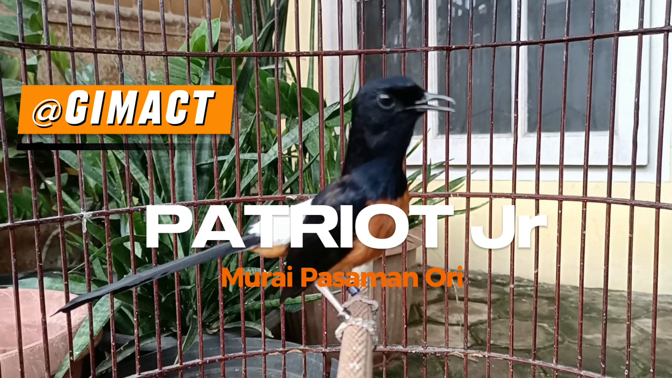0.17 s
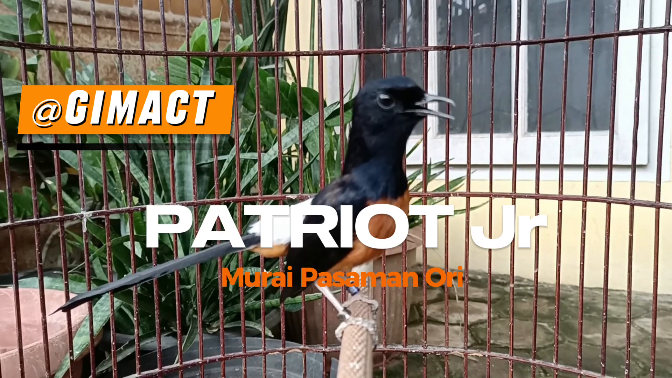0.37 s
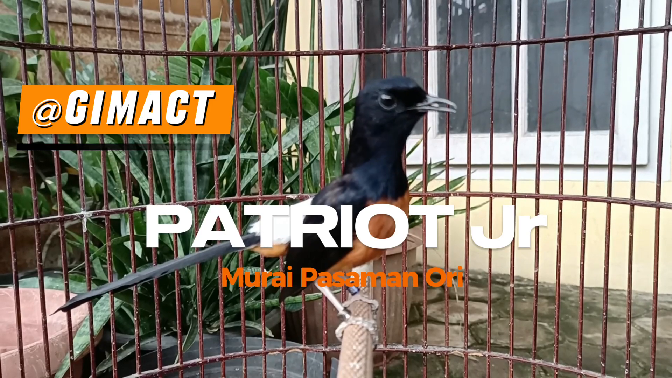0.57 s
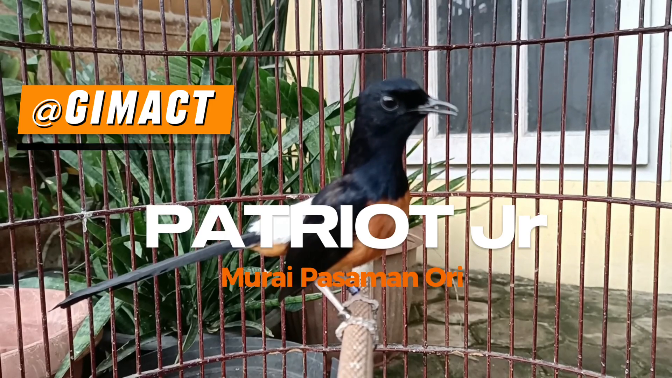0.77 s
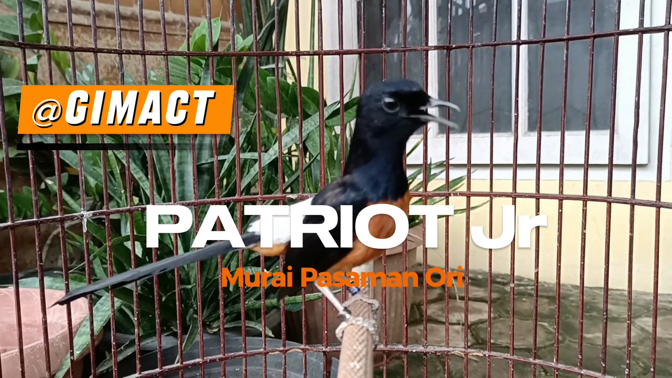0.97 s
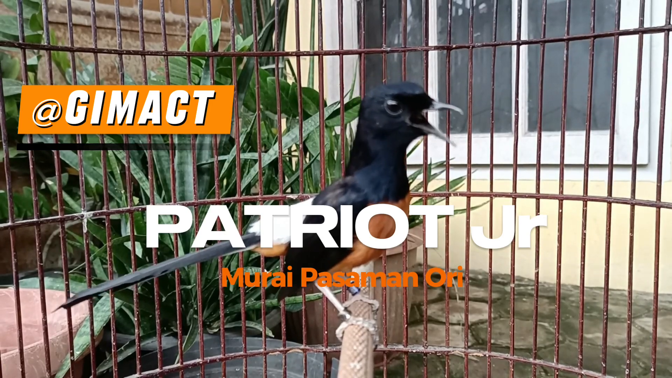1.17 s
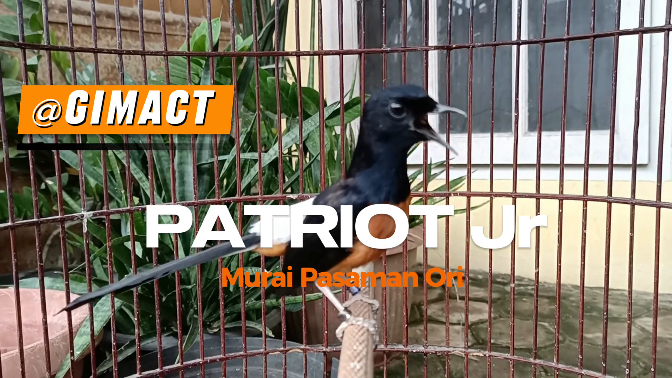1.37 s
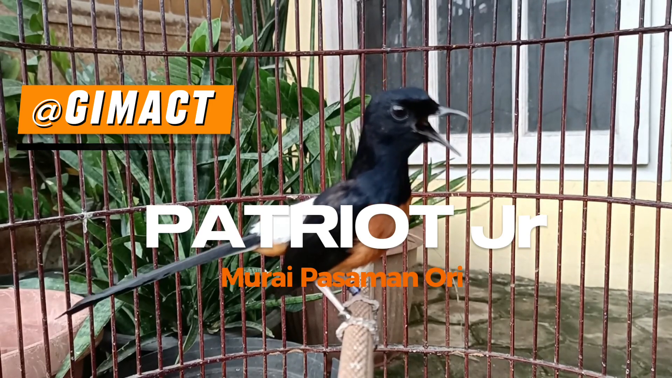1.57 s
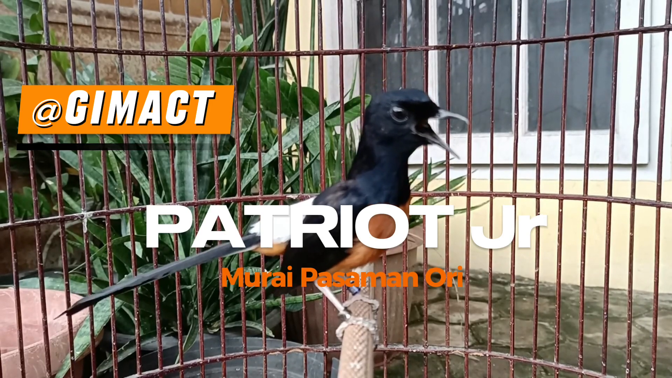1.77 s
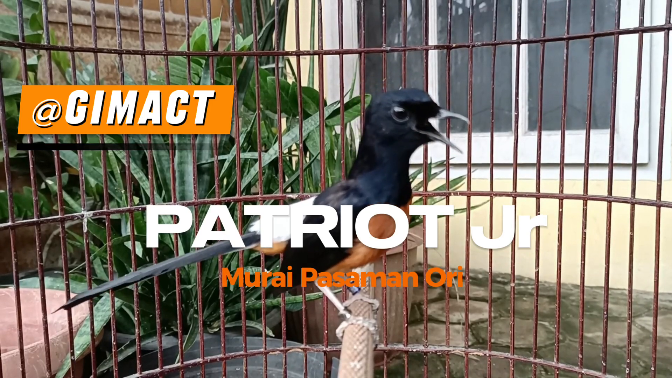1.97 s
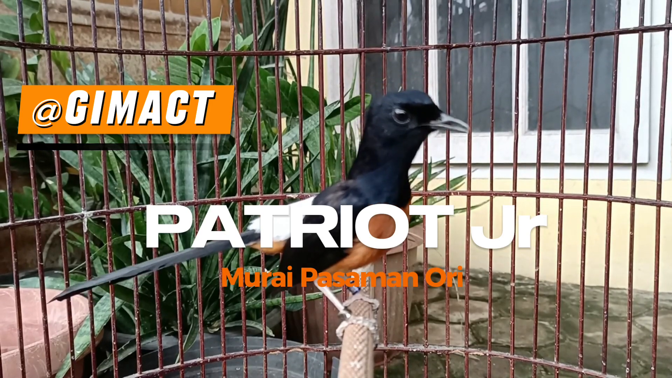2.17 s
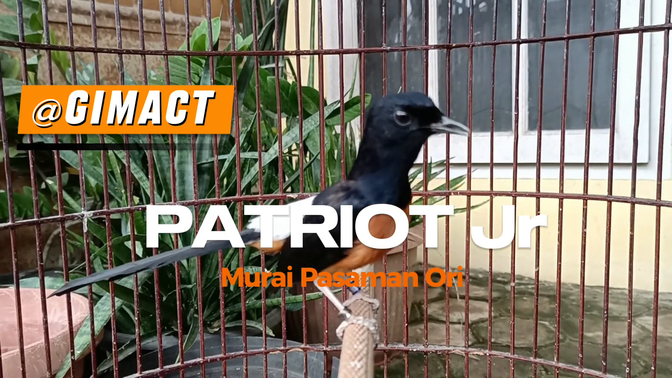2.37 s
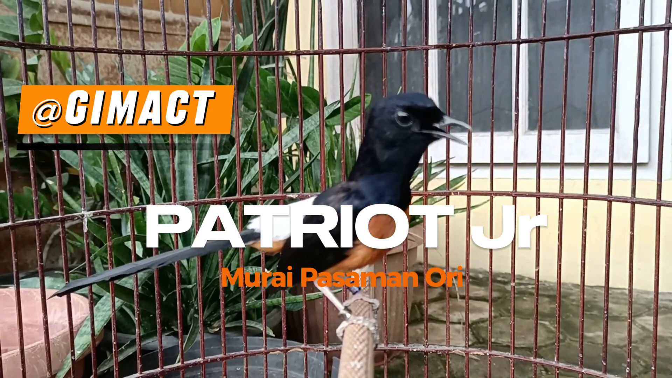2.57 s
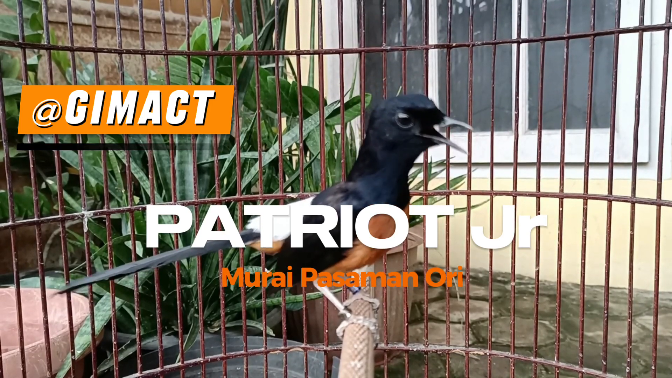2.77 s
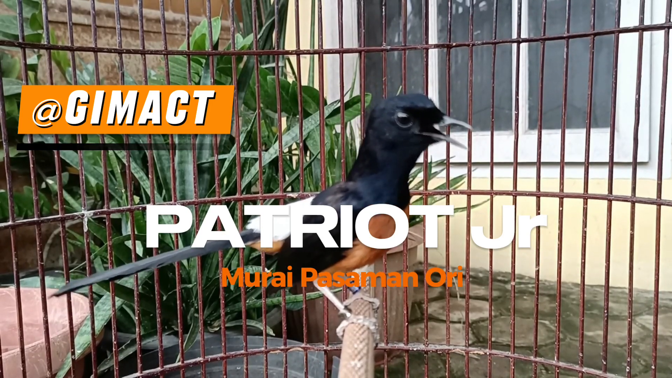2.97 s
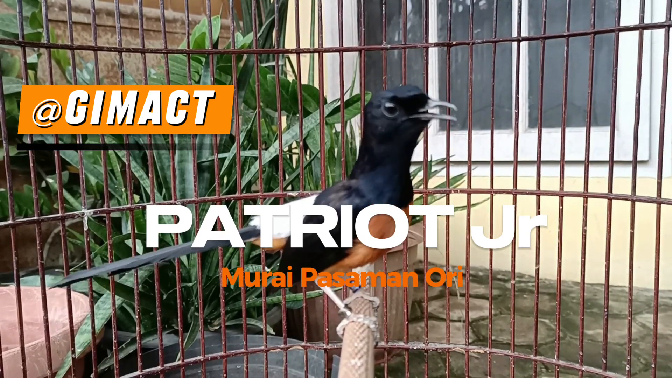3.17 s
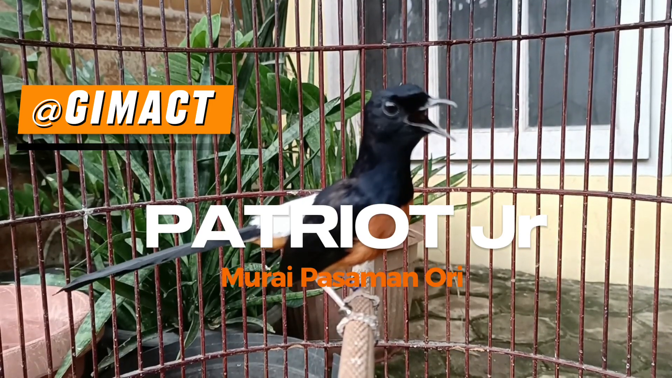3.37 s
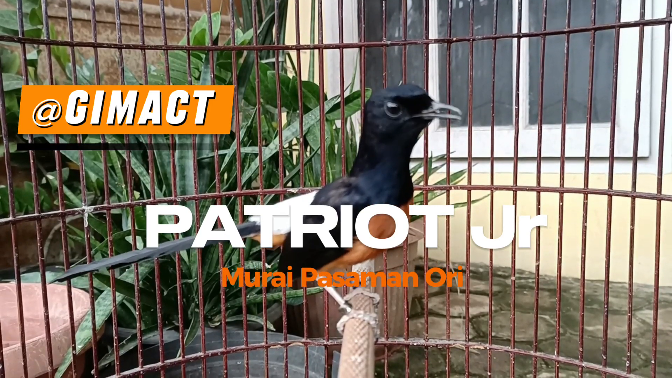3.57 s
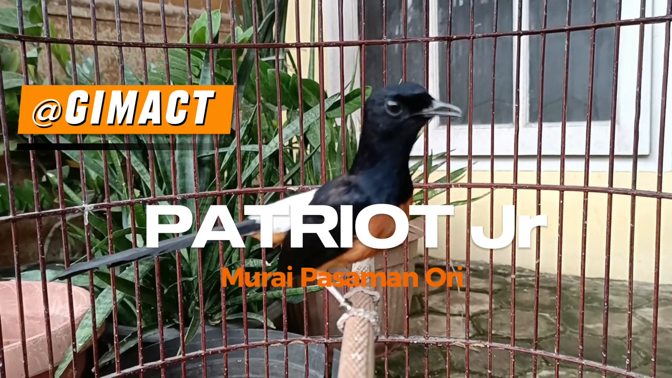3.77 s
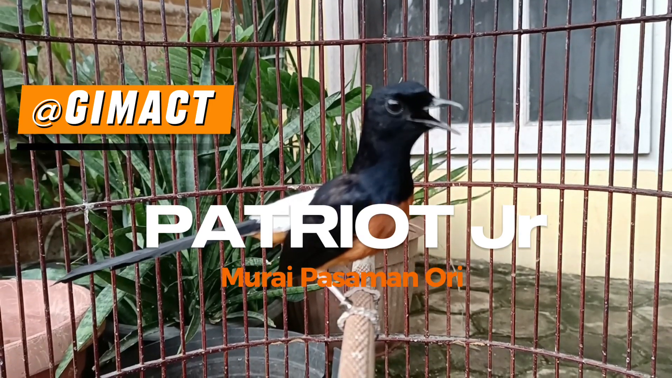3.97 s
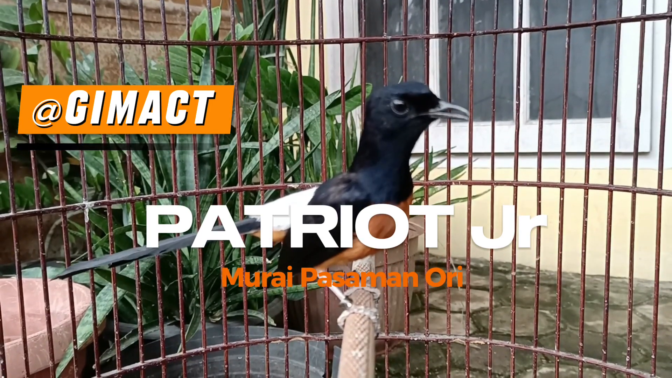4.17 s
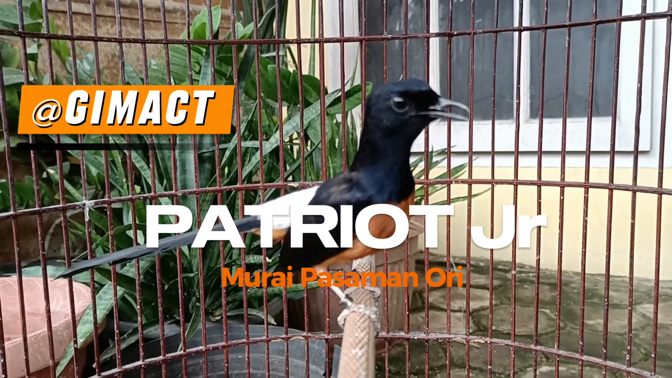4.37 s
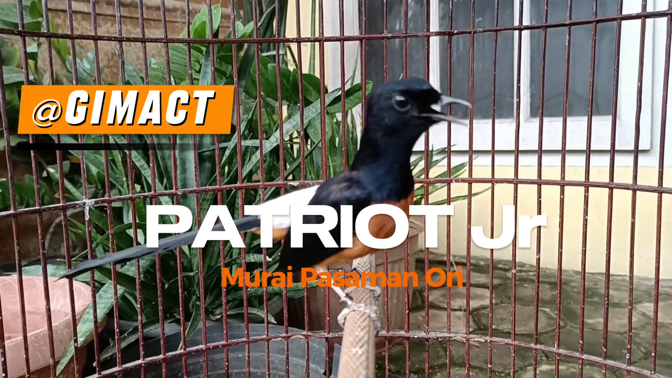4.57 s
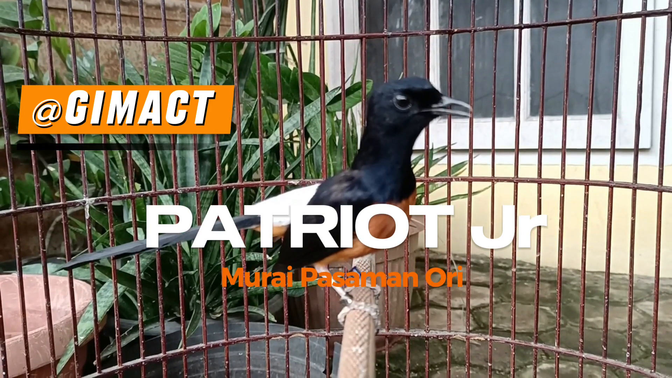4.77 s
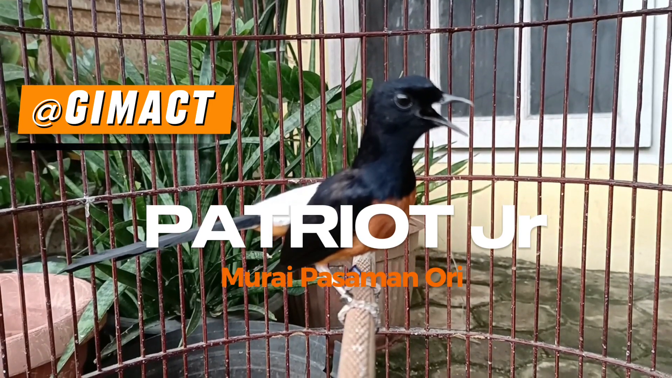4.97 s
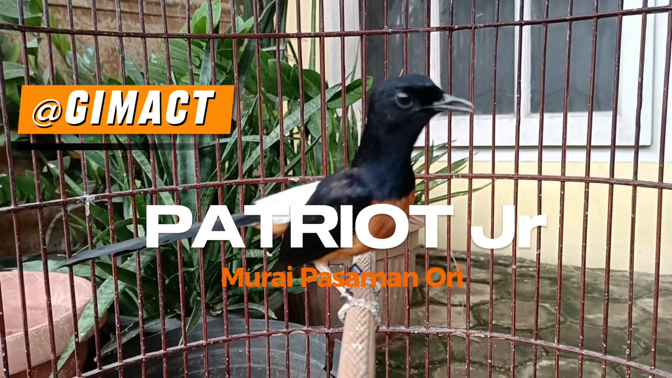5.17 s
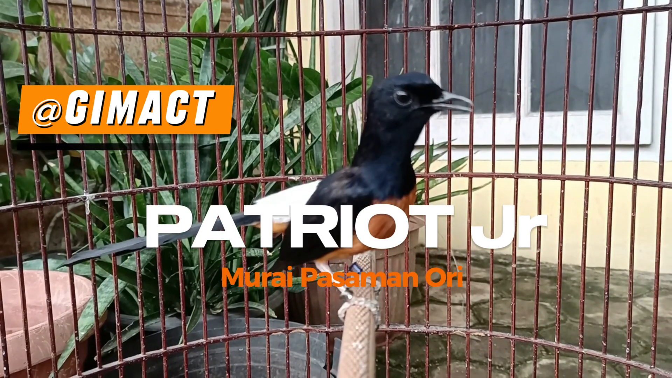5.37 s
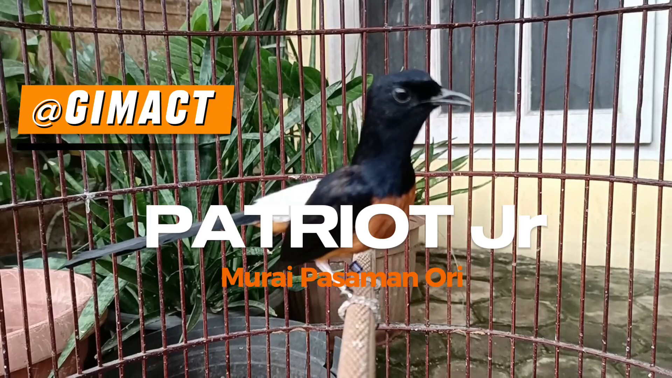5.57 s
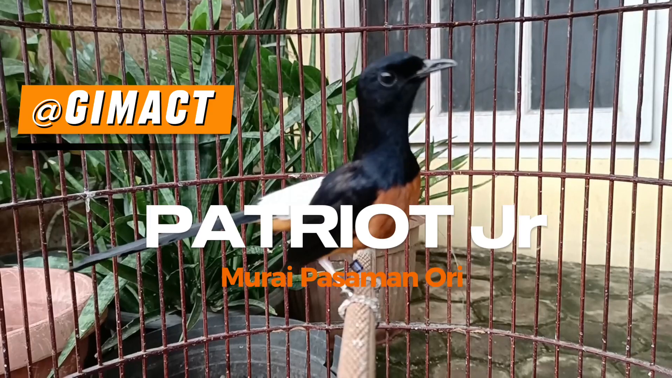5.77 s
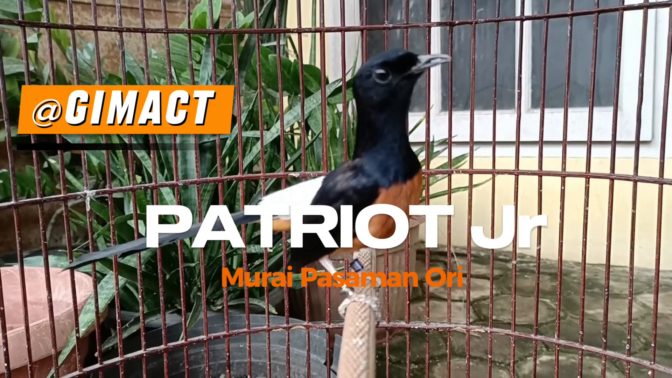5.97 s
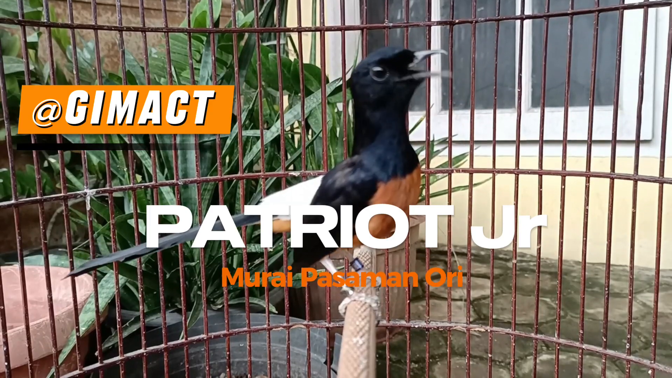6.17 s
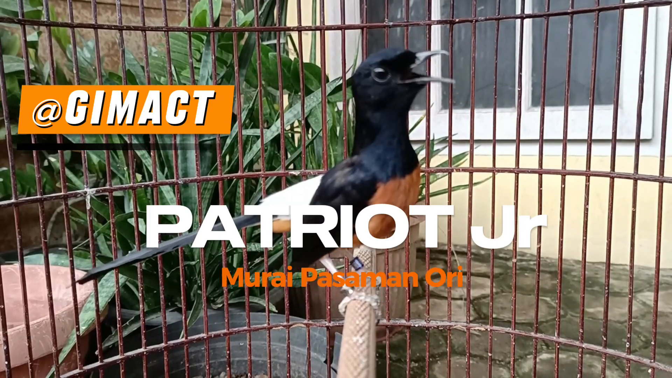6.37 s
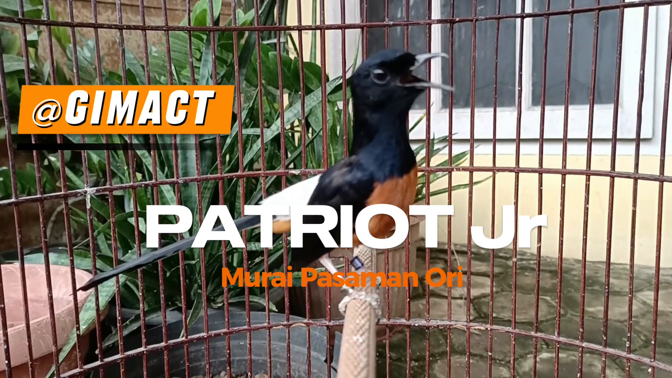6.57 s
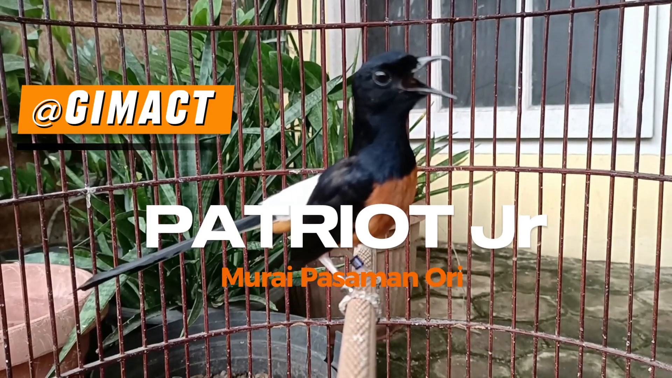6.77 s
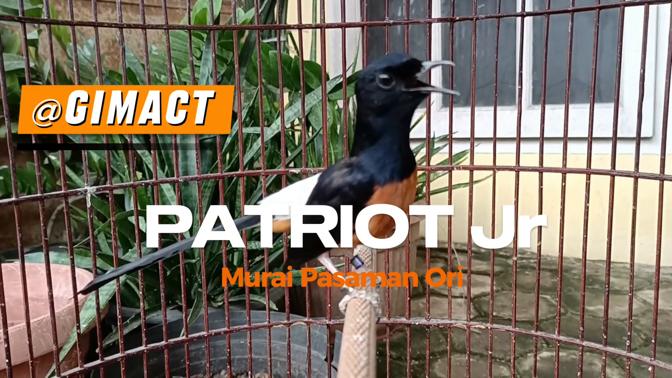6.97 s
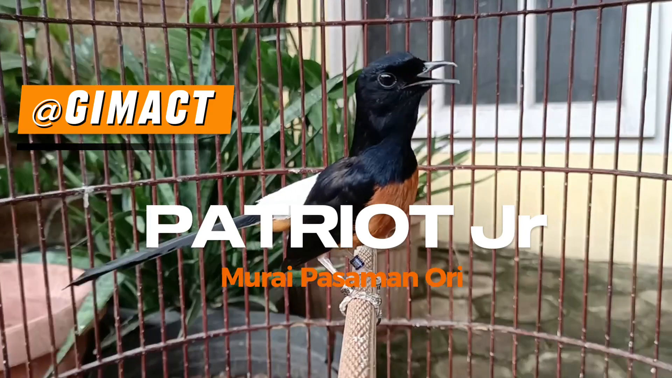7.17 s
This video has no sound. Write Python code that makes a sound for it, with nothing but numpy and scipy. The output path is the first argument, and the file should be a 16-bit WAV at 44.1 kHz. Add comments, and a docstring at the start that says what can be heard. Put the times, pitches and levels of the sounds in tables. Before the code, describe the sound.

A songbird sings close by in a small yard, with clear whistles, rising warbled sweeps and a fast run of high notes.

```python
"""In a small yard a shama sings close by in a wire cage: soft low whistles, rising warbled sweeps,
held notes and a fast run. Each note is a nearly pure tone from one side of the syrinx; at times both
sides sound at once. Feathers rustle by friction as the bird flicks and shifts on its perch.
The walls reflect the song, the rustle and the calls of distant birds, over faint far engines."""
import sys
import numpy as np
from scipy import signal
from scipy.fft import rfft, irfft
from scipy.io import wavfile
from scipy.ndimage import uniform_filter1d, minimum_filter1d

SR = 44100
rng = np.random.default_rng(int(sys.argv[2]) if len(sys.argv) > 2 else 0)


def generate_wav(signal):
    """Clip the signal to [-1, 1] and save it as 16-bit WAV at the path in sys.argv[1]."""
    frames = np.transpose(np.atleast_2d(signal))
    scaled = np.clip(frames, -1, 1) * 32767
    pcm = np.round(scaled).astype(np.int16)
    wavfile.write(sys.argv[1], SR, pcm)


N = 318833
T = np.arange(N) / SR


def undb(db):
    """Decibels to amplitude ratio."""
    return 10 ** (np.asarray(db) / 20)


def walk(rate_hz, size):
    """Smooth random modulation with a spread near 1."""
    k = max(int(SR / rate_hz), 2)
    steps = np.repeat(rng.standard_normal(size // k + 1), k)
    return 1.35 * uniform_filter1d(uniform_filter1d(steps, k), k)[:size]


def noise(spectrum, coherence):
    """Partly coherent stereo noise of rms 1; coherence is the share of power common to both ears."""
    hz, db = np.transpose(spectrum)
    bins_hz = np.maximum(np.fft.rfftfreq(N, 1 / SR), 1)
    white = rng.standard_normal((3, N))
    pair = np.sqrt(coherence) * white[2] + np.sqrt(1 - coherence) * white[:2]
    out = irfft(rfft(pair) * undb(np.interp(np.log(bins_hz), np.log(hz), db)), N)
    return out / out.std()


def add(out, start_s, sound):
    """Superpose a stereo sound on the mix."""
    i = int(start_s * SR)
    out[:, i:i + sound.shape[1]] += sound[:, :N - i]


def clock(length_s):
    """Time into a note, in seconds and as a share of its length."""
    t = np.arange(int(length_s * SR)) / SR
    return t, t / t[-1]


# spectrum of the yard's background: frequency_hz, relative_db
AIR_SPECTRUM = [(25, -3), (70, -7), (130, -5.5), (250, -9), (500, -13.5), (1100, -20.5), (2100, -18.5),
                (4000, -21), (8000, -27), (11000, -33.5), (15500, -37.5)]

def air(level_db=-54.5, sway_db=1):
    """Ambient noise: a faint, dark hiss whose level sways slowly."""
    return noise(AIR_SPECTRUM, coherence=0.39) * undb(level_db + sway_db * walk(3.5, N))


def engine(course, harmonics, fading_db=4.0, wander=0.0048):
    """Periodic firing makes a harmonic series; a few harmonics carry, each fading in and out on its way."""
    time_s, firing_hz, level_db = np.transpose(course)
    hz = np.interp(T, time_s, firing_hz) * (1 + wander * walk(12, N))
    phase = 2 * np.pi * np.cumsum(hz) / SR
    tones = sum(undb(db + fading_db * walk(3.4, N)) * np.sin(round(k) * phase) for k, db in harmonics)
    return tones * undb(np.interp(T, time_s, level_db))


# course of each engine: time_s, firing_hz, level_db
MOTOR_COURSE = [(0, 31.5, -99), (1.5, 32.25, -63), (2.6, 33.26, -62.5), (3.6, 34.5, -60.5),
                (4.6, 34.7, -57), (5.6, 36.2, -59), (6.4, 37.78, -55), (7.23, 40.55, -58)]
SCOOTER_COURSE = [(1.6, 184, -85), (2.0, 189, -70), (2.4, 196, -67), (2.76, 201, -68), (2.9, 202.4, -75),
                  (3.1, 185, -96)]
# harmonics that carry: harmonic_number, relative_db
MOTOR_HARMONICS = [(1, -3), (2, -1), (3, -2), (4, -5.5)]
SCOOTER_HARMONICS = [(2, -6), (3, -4), (4, 1), (5, -8)]

def traffic():
    """Pitch follows firing rate: a far motor slowly speeds up, and a scooter comes and goes."""
    return engine(MOTOR_COURSE, MOTOR_HARMONICS) + engine(SCOOTER_COURSE, SCOOTER_HARMONICS)


# distant calls: start_s, end_s, pitch_hz, glide_hz, scatter_ratio, relative_db
DISTANT_CALLS = [(.69, .735, 1920, 220, .015, -54), (0.884, 1.072, 2132, 59, .025, -55),
                 (1.151, 1.271, 2170, -63, .025, -56), (4.27, 4.5, 2100, 0, .06, -61.5),
                 (4.682, 4.776, 2150, -100, .13, -61), (5.77, 5.86, 1950, 150, .17, -60)]

def far_birds():
    """Random frequency modulation broadens a tone: a little leaves a whistle, more makes a harsh chirp."""
    out = np.zeros((2, N))
    for start, end, pitch_hz, glide_hz, scatter, db in DISTANT_CALLS:
        u = np.clip((T - start) / (end - start), 0, 1)
        hz = (pitch_hz + glide_hz * u) * (1 + scatter * walk(700, N))
        envelope = np.sqrt(np.abs(np.sin(np.pi * u)))
        out += undb(db) * envelope * np.sin(2 * np.pi * np.cumsum(hz) / SR)
    return out


# reflections from nearby surfaces: delay_s, left_db, right_db
REFLECTIONS = [(.0052, -33, -17.5), (.0093, -24.5, -17.5), (0.0142, -14.5, -13.5), (0.0215, -21, -23.5)]

def walls(sound, t60_s=0.52, treble_t60_s=0.42, split_hz=7000, tail_db=-21,
          early_db=-14, early_t60_s=0.27, gap_s=0.017):
    """Reverberation: near reflections, quick scattering from cage and plants, then the yard's decay."""
    t = np.arange(SR) / SR
    white, scatter = rng.standard_normal((2, 2, SR))
    low = signal.sosfiltfilt(signal.butter(2, split_hz, "low", fs=SR, output="sos"), white)
    treble = white - low
    onset = np.clip((t - gap_s) / 0.0056, 0, 1)
    tail = onset * (low * undb(-60 * t / t60_s) + treble * undb(-60 * t / treble_t60_s))
    early = onset * scatter * undb(-60 * t / early_t60_s)
    response = sum(undb(db) * part / np.sqrt(np.sum(part ** 2) / 2)
                   for db, part in [(tail_db, tail), (early_db, early)])
    for delay_s, left_db, right_db in REFLECTIONS:
        response[:, int(delay_s * SR)] += undb([left_db, right_db])
    return signal.fftconvolve(sound, response, axes=1)[:, :N]


# spectra of the swish and of its low body: frequency_hz, relative_db
SWISH_SPECTRUM = [(300, -27.5), (1200, -23), (2200, -4), (3300, 6), (5500, 2), (8000, -2), (11000, -12.5),
                  (15500, -9)]
BODY_SPECTRUM = [(50, -19.5), (110, -4), (200, -5.5), (450, -2.5), (900, -9.5), (1800, -7), (3500, -13.5),
                 (8000, -45.5)]
# feather flicks and foot shuffles: start_s, rise_s, hold_s, swish_db, body_db
FEATHER_STROKES = [(1.554, 0.013, 0.054, -42.5, -48.5), (1.654, 0.011, 0.14, -60, -50.5),
                   (2.159, 0.018, 0.041, -38, -44.5), (3.038, .008, .035, -34.5, -45),
                   (3.222, 0.0033, 0.05, -45, -52), (3.267, 0.02, 0.0062, -32, -25.5),
                   (4.898, 0.009, 0.021, -34.5, -53.5), (5.244, 0.024, 0.094, -62.5, -52),
                   (7.089, 0.027, 0.064, -32.5, -70)]

def feathers(fade_s=0.004, grain_db=3):
    """Friction between feathers makes a grainy swish; a strong flick also pushes air and knocks the perch."""
    swish, body = np.zeros(N), np.zeros(N)
    for start, rise_s, hold_s, swish_db, body_db in FEATHER_STROKES:
        fade = np.exp(-np.maximum(T - start - rise_s - hold_s, 0) / fade_s)
        stroke = np.clip((T - start) / rise_s, 0, 1) * fade
        swish += undb(swish_db) * stroke
        body += undb(body_db) * stroke
    grain = undb(grain_db * walk(500, N))
    return swish * grain * noise(SWISH_SPECTRUM, 0.63) + body * noise(BODY_SPECTRUM, 0.57)


# filtering of the overtones by throat and open beak: frequency_hz, gain_db
BEAK_RESPONSE = [(2700, 9), (5000, -6.5), (7500, 7), (9500, -6), (11300, 7), (12400, -4), (14000, 0.5),
                 (15300, 3.5)]
# paths from the perch to the two microphones: frequency_hz, left_minus_right_db, left_lead_rad
STEREO_PATHS = [(1550, 5, 0.25), (2350, 0, 0.5), (2870, -1, 0.7), (3080, -1.5, 1.09), (3677, -2.5, 0.9),
                (3952, -1, 0.46), (4045, -2, 1.11), (4213, 0.5, 1.03), (4478, -5, -1.4), (4855, -7, -2),
                (5100, -3.5, -2), (7900, 0, -2), (12070, -4, -2), (14000, -5.5, -1.85)]

def syrinx(hz, db, attack_s, release_s, second_db, third_db, rough=0.0047, flutter_db=0.27,
           rasp=0.017, rasp_s=0.008):
    """Source and filter: one side of the syrinx vibrates, raspy at first; weak overtones pass the throat."""
    size = len(hz)
    t = np.arange(size) / SR
    hz = hz * (1 + rough * walk(300, size) + rasp * np.exp(-t / rasp_s) * walk(1200, size))
    phase = 2 * np.pi * np.cumsum(hz) / SR
    attack = np.sin(np.pi / 2 * np.clip(t / attack_s, 0, 1))
    release = np.sin(np.pi / 2 * np.clip((t[-1] - t) / release_s, 0, 1))
    envelope = (attack * release) ** 1.57
    # the beak gapes as the pitch climbs and lets more of the harmonics out
    gape = np.clip((hz - hz.mean()) / 1000, -0.7, 0.7)
    harmonics_db = [0, second_db + 11 * gape, third_db + 15 * gape, third_db - 20]
    path_hz, pan_db, lead_rad = np.transpose(STEREO_PATHS)
    sides, tone = np.array([[0.5], [-0.5]]), 0
    for k, harmonic_db in enumerate(harmonics_db, 1):
        beak_db = (k > 1) * np.interp(k * hz, *np.transpose(BEAK_RESPONSE))
        gain = undb(harmonic_db + beak_db) * (k * hz < SR / 2)
        pan = undb(np.interp(k * hz, path_hz, pan_db) * sides)
        pan /= np.sqrt(np.mean(pan ** 2, axis=0))
        tone += gain * pan * np.sin(k * phase + np.interp(k * hz, path_hz, lead_rad) * sides)
    return np.sqrt(2) * envelope * undb(db + flutter_db * walk(140, size)) * tone


# soft whistles, one list of points each: time_s, pitch_hz, level_db
WINDING_CONTOURS = [
    [(.064, 2370, -49.5), (.092, 2086, -21.5), (.112, 1830, -31), (.138, 1446, -40), (.16, 1350, -41.5),
     (.188, 1540, -34), (.215, 1598, -24), (.248, 1475, -35), (.272, 1310, -48.5)],
    [(.314, 1785, -49), (.329, 2340, -25), (.348, 2360, -21), (.36, 2690, -18.5), (.378, 2593, -28.5)],
    [(5.336, 1380, -56), (5.35, 2076, -39.5), (5.365, 2285, -23.5), (5.381, 1947, -35), (5.391, 1648, -24),
     (5.404, 1660, -43), (5.42, 2270, -31), (5.434, 2390, -30)],
]

def winding_whistles(smooth_s=0.007):
    """Continuous frequency glides: soft, low notes wind up and down without a break."""
    out = np.zeros((2, N))
    for contour in WINDING_CONTOURS:
        time_s, pitch_hz, level_db = np.transpose(contour)
        start = time_s[0]
        t, _ = clock(time_s[-1] - start)
        hz = uniform_filter1d(np.interp(start + t, time_s, pitch_hz), int(smooth_s * SR))
        db = np.interp(start + t, time_s, level_db)
        add(out, start, syrinx(hz, db, attack_s=0.0042, release_s=0.005,
                               second_db=-30.5, third_db=-45, rough=0.002))
    return out


# single whistles: start_s, end_s, first_hz, middle_hz, last_hz, scoop_hz, level_db,
# attack_s, release_s, second_harmonic_db, third_harmonic_db
WHISTLE_ARCS = [(0.423, 0.554, 2046, 2017, 1835, -6, -56, .02, .03, -35, -32),
                (0.762, 0.821, 2650, 2830, 2830, 5.5, -43.5, 0.014, 0.0057, -34.5, -60),
                (2.408, 2.453, 1935, 2310, 2754, -6, -32, 0.039, .006, -19, -48),
                (2.445, 2.557, 2646, 2796, 2472, -6, -12.5, 0.029, .035, -40.5, -43.5),
                (2.547, 2.584, 2470, 2303, 2000, 0.5, -15.5, 0.011, 0.036, -31.5, -45),
                (2.624, 2.765, 4473, 4521, 4450, -200, -8, .055, .045, -19, -19),
                (2.837, 2.926, 3544, 3772, 3628, -250, -7.5, 0.034, .018, -30.5, -39),
                (3.021, 3.101, 2840, 3086, 3188, -1, -5.5, 0.086, 0.017, -34.5, -61),
                (3.274, 3.429, 3890, 3933, 3860, -250, -7, .018, 0.021, -35, -37.5),
                (5.337, 5.367, 2650, 3150, 3610, 2, -35.5, 0.0052, .01, -30.5, -32.5),
                (6.074, 6.108, 3970, 4380, 4250, 1, -27, 0.01, 0.012, -20, -43),
                (6.089, 6.149, 3620, 3010, 2794, 0.5, -20.5, 0.022, 0.011, -33, -43.5),
                (6.146, 6.2, 5110, 4530, 4526, -6, -17, 0.033, .008, -13, -31),
                (7.002, 7.025, 3830, 3760, 3690, -11.5, -7, 0.0089, 0.015, -39, -47.5),
                (7.009, 7.057, 2250, 2340, 2023, -8, -25.5, 0.014, 0.013, -20, -32),
                (7.052, 7.118, 3980, 3974, 4100, 752, -7.5, 0.034, 0.015, -23.5, -30.5),
                (7.171, 7.233, 1650, 2187, 2425, -4, -12, 0.087, 0.02, -25, -40)]

def whistles(scoop_s=0.016, drop_hz=453, drop_s=0.004, strain_hz=4200):
    """Two-voice phonation: pitch arcs, clear when low, strained when high, overlap when both sides sound."""
    out = np.zeros((2, N))
    for start, end, first_hz, middle_hz, last_hz, scoop_hz, db, *voicing in WHISTLE_ARCS:
        t, u = clock(end - start)
        arc = np.polyval(np.polyfit([0, 0.5, 1], [first_hz, middle_hz, last_hz], 2), u)
        scoop = scoop_hz * np.exp(-t / scoop_s)
        drop = drop_hz * np.exp((t - t[-1]) / drop_s)  # pitch falls as the pressure goes
        strain = np.clip((arc - strain_hz) / 1000, 0, 0.35)
        note = syrinx(arc + scoop - drop, db, *voicing, rough=0.002 + 0.035 * strain, flutter_db=2.3)
        add(out, start, note)
    return out


# warbled sweeps: start_s, end_s, from_hz, to_hz, level_db, calm_s, shake_s, shake_rate_hz, depth_hz
RISING_SWEEPS = [(0.809, 0.891, 4070, 5800, -14.5, 0.0033, 0.093, 113.6, 81.3),
                 (.959, 1.095, 3940, 5527, -12, 0.036, 0.089, 108.6, 65),
                 (1.127, 1.277, 3950, 5455, -10.5, .03, 0.12, 97.6, 65),
                 (1.304, 1.442, 3942, 5476, -9.5, 0.035, .09, 105.5, 65),
                 (1.476, 1.618, 4114, 5493, -11, .035, 0.099, 85.2, 120),
                 (1.669, 1.803, 4453, 5327, -10, .022, 0.11, 58.3, 282),
                 (1.903, 2.044, 4280, 4860, -12, 0.021, 0.13, 58.6, 332)]

def sweeps(top_share=0.93, fade_db=6, grow_s=0.016, detune_db_per_khz=8):
    """Coupled frequency and amplitude modulation: the tone weakens as it climbs and at each upward shake."""
    out = np.zeros((2, N))
    for start, end, from_hz, to_hz, db, calm_s, shake_s, rate_hz, depth_hz in RISING_SWEEPS:
        t, u = clock(end - start)
        climb = np.sin(np.pi / 2 * np.minimum(u / top_share, 1)) ** 2
        shaking = np.clip(np.minimum(t - calm_s, calm_s + shake_s - t) / grow_s, 0, 1)
        cycles = rate_hz * np.cumsum(1 + 0.12 * walk(60, len(t))) / SR
        shake_hz = shaking * depth_hz * undb(walk(80, len(t))) * np.sin(2 * np.pi * cycles)
        hz = from_hz + (to_hz - from_hz) * climb + shake_hz
        level_db = db - fade_db * climb ** 2 - detune_db_per_khz * shake_hz / 1000
        add(out, start, syrinx(hz, level_db, attack_s=0.013, release_s=0.0072, second_db=-21, third_db=-22,
                               rough=0.0036 + 0.014 * shaking, flutter_db=1.5 + 2 * shaking))
    return out


def low_flick(db, from_hz=1440, to_hz=3130, glide_s=0.015, swell_db=10):
    """Exponential glide: the low side of the syrinx flicks up, levels off and swells."""
    t, u = clock(0.055)
    hz = to_hz + (from_hz - to_hz) * np.exp(-t / glide_s)
    level_db = db - swell_db * (1 - u)
    return syrinx(hz, level_db, attack_s=0.065, release_s=0.0041, second_db=-33.5, third_db=-48)


def upper_chirp(db, from_hz=3320, to_hz=4120):
    """Linear chirp: the high side of the syrinx rises briefly."""
    _, u = clock(0.021)
    hz = from_hz + (to_hz - from_hz) * u
    return syrinx(hz, db, attack_s=0.011, release_s=0.009, second_db=-27, third_db=-50)


def held_whistle(db, second_db, third_db, from_hz=4057, to_hz=4430, fade_db=9.5, swell_db=12.5):
    """Sustained oscillation: the tone sags as it swells, then bends up and fades."""
    t, u = clock(0.143)
    sag_hz = 160 * np.exp(-t / 0.012)
    hook_hz = 109 * np.exp((t - t[-1]) / 0.008)
    hz = from_hz + (to_hz - from_hz) * u ** 1.8 + sag_hz + hook_hz
    level_db = db - fade_db * u - swell_db * np.exp(-(t / 0.027) ** 2)
    return syrinx(hz, level_db, attack_s=0.024, release_s=0.023, second_db=second_db, third_db=third_db,
                  rough=0.002 + 0.0073 * u ** 3, flutter_db=0.6)


# a repeated call: flick_start_s, whistle_start_s, flick_db, chirp_db, whistle_db,
# whistle_second_harmonic_db, whistle_third_harmonic_db
SLURRED_CALLS = [(3.874, 3.925, -17.5, -38, -2.5, -31.5, -33), (4.358, 4.411, -18, -40, -3.5, -37.5, -36.5),
                 (4.848, 4.899, -14, -27, -3.5, -38.5, -37.5)]

def slurs():
    """Biphonation: both sides of the syrinx flick upward at once, and a held whistle follows."""
    out = np.zeros((2, N))
    for flick_s, whistle_s, flick_db, chirp_db, whistle_db, second_db, third_db in SLURRED_CALLS:
        add(out, flick_s, low_flick(flick_db))
        add(out, flick_s, upper_chirp(chirp_db))
        add(out, whistle_s, held_whistle(whistle_db, second_db, third_db))
    return out


# the fast run: start_s, end_s, pitch_hz, level_db
PIP_RUN = [(6.225, 6.265, 4420, -9.5), (6.298, 6.341, 4455, -9.5), (6.368, 6.408, 4504, -10),
           (6.441, 6.486, 4458, -9), (6.513, 6.558, 4326, -6.5), (6.587, 6.637, 4246, -8.5),
           (6.668, 6.71, 4135, -5.5), (6.747, 6.789, 4142, -4), (6.83, 6.874, 4103, -5),
           (6.909, 6.951, 4080, -6.5)]

def pips(rise_hz=70, hook_hz=150, hook_s=0.0046, bright_db_per_khz=27.5):
    """Tone bursts: each rises slightly and hooks upward; higher ones have a stronger second harmonic."""
    out = np.zeros((2, N))
    mean_hz = np.mean([hz for _, _, hz, _ in PIP_RUN])
    for start, end, pitch_hz, db in PIP_RUN:
        t, u = clock(end - start)
        hz = pitch_hz + rise_hz * (u - 0.5) + hook_hz * np.exp((t - t[-1]) / hook_s)
        second_db = -22 + bright_db_per_khz * (pitch_hz - mean_hz) / 1000
        add(out, start, syrinx(hz, db, attack_s=0.02, release_s=0.014, second_db=second_db, third_db=-31,
                               rough=0.0068, rasp=0.023))
    return out


def scene(song_db=0.3, rustle_echo_db=6, far_echo_db=14):
    """Directivity: the song is beamed, the rustle spreads and echoes more; far birds arrive only by echo."""
    song = undb(song_db) * (winding_whistles() + whistles() + sweeps() + slurs() + pips())
    rustle = feathers()
    echoes = walls(song + undb(rustle_echo_db) * rustle + undb(far_echo_db) * far_birds())
    return air() + traffic() + echoes + rustle + song


def record(dry, ceiling_db=-2, hold_s=0.0045, top_hz=15750):
    """Look-ahead limiting levels the loudest notes; a steep low-pass filter bounds the bandwidth."""
    size = int(hold_s * SR)
    allowed_gain = np.minimum(1, undb(ceiling_db) / (np.abs(dry).max(axis=0) + 1e-9))
    gain = uniform_filter1d(minimum_filter1d(allowed_gain, size), size)
    return signal.sosfilt(signal.ellip(10, 0.1, 80, top_hz, fs=SR, output="sos"), dry * gain)


dry = scene()
out = record(dry)
generate_wav(out)
```